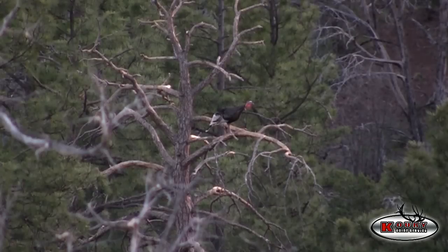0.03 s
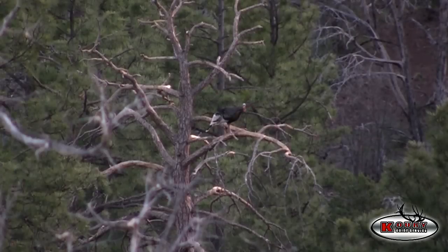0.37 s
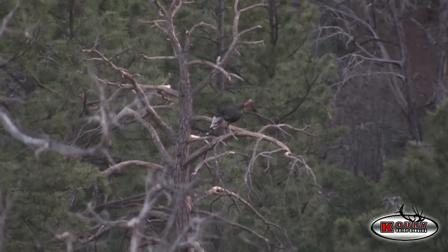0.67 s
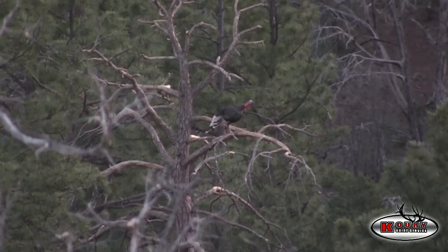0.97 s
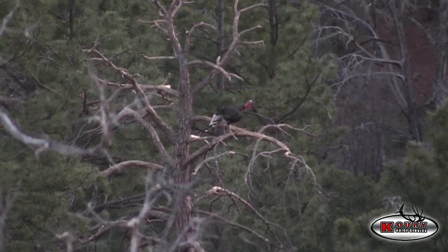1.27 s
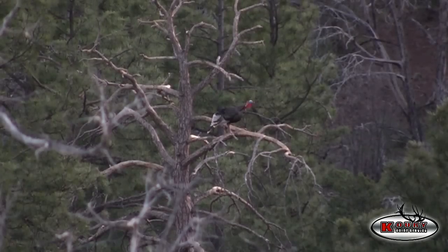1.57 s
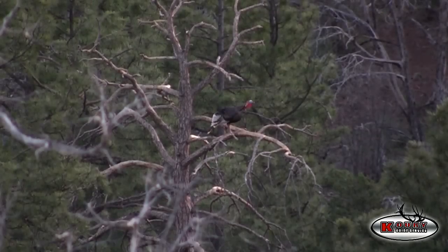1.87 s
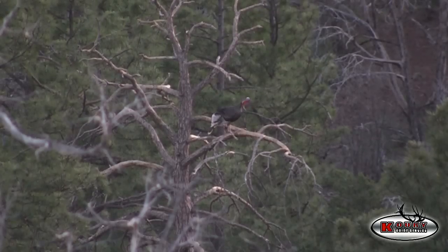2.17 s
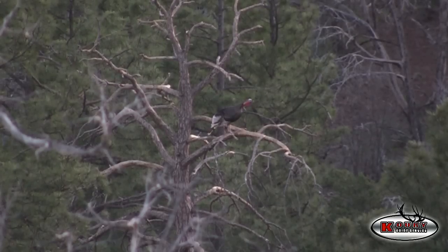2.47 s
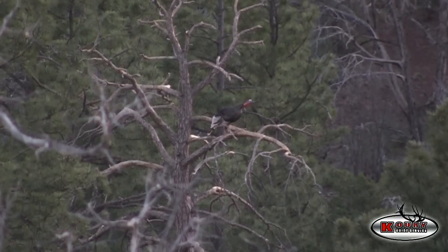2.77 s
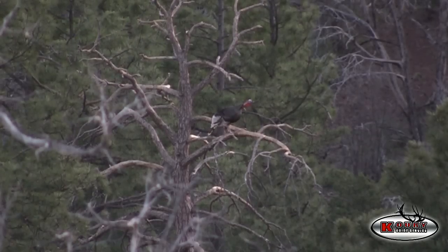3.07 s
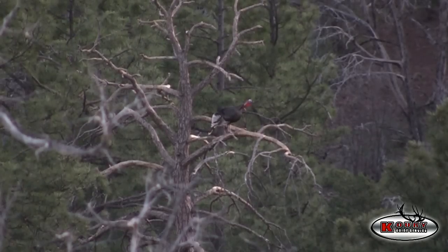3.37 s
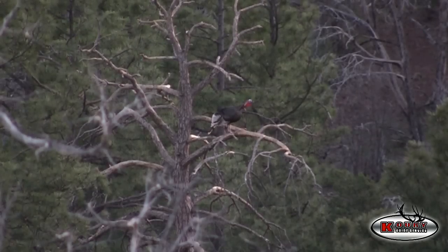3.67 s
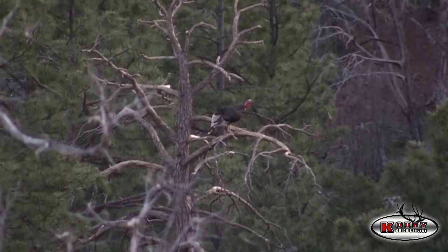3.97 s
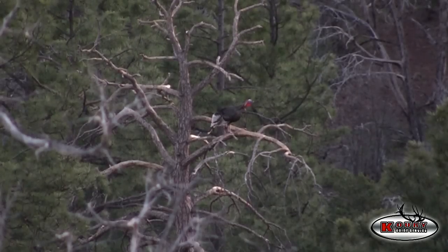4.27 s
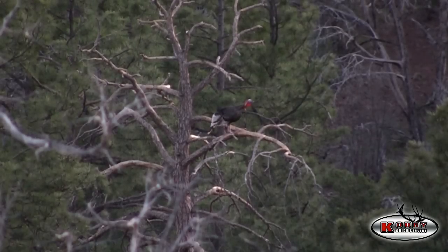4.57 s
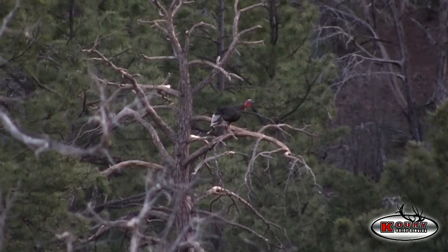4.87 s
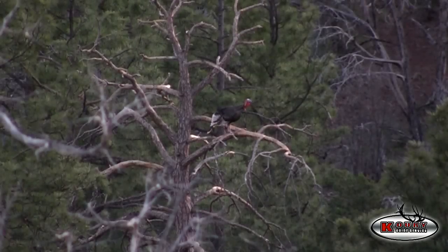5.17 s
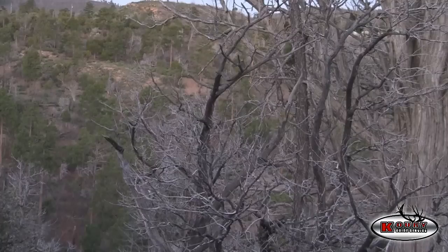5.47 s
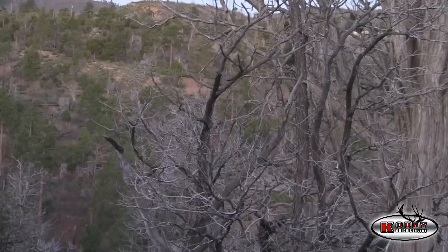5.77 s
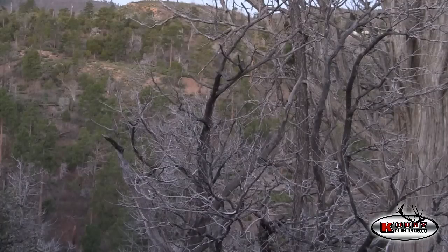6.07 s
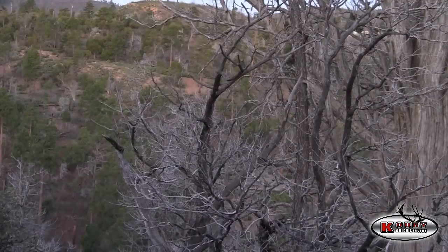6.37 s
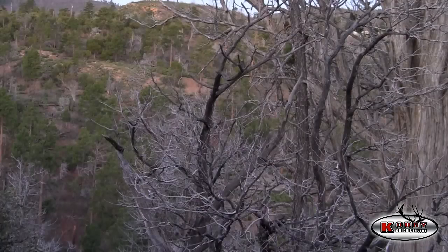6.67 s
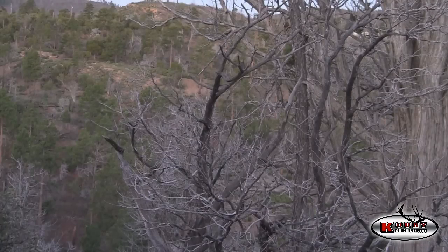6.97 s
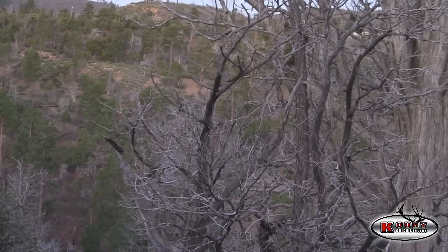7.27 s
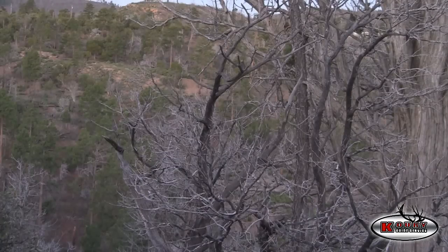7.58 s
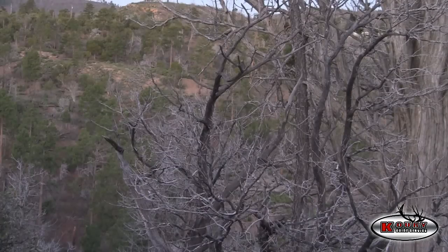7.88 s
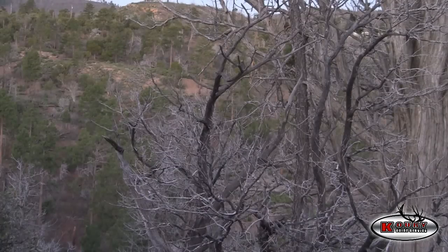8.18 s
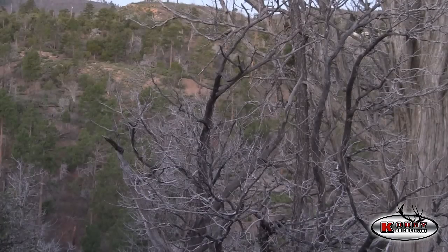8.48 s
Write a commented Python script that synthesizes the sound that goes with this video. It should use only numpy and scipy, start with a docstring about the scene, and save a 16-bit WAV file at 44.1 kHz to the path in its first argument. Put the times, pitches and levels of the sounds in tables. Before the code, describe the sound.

Five rattling turkey gobbles carry through the woods with a faint echo, while low wind rumble bumps the microphone early on.

```python
"""Wild turkey in a pine forest

A turkey gobbles five times from some way off. Pushes of air through its syrinx make a rattle of short
yelps and gulps around a few long slurs and warbles; a sharp putt opens the last gobble. A small bird
calls once, and the trunks scatter a faint echo over soft air noise and hiss. Wind eddies buffet the
right microphone, mostly in the first half; a bump, ticks and rustles sound close by."""
import sys
import numpy as np
from scipy import signal
from scipy.fft import rfft, irfft
from scipy.io import wavfile
from scipy.ndimage import map_coordinates

SR = 44100
rng = np.random.default_rng(int(sys.argv[2]) if len(sys.argv) > 2 else 0)


def generate_wav(sig):
    """Save sig (samples, or channels by samples) to the path in sys.argv[1] as 16-bit PCM at SR."""
    pcm = np.round(np.clip(np.atleast_2d(sig).T, -1, 1) * 32767).astype(np.int16)
    wavfile.write(sys.argv[1], SR, pcm)


N = 380583
TIME = np.arange(N) / SR

# Background air. Each row: frequency in Hz, relative spectral density in dB.
AIR_SPECTRUM = [(15, -13), (25, -8), (126, -4.5), (204, -5), (421, -7.5), (614, -10.5), (919, -14),
                (1170, -16), (1660, -18.5), (2300, -20.5), (3000, -21.5), (12500, -30), (15500, -34.5)]
# The air's upper band and its low band. Each row: time in seconds, gain in dB.
HISS_GAIN = [(0, 1), (1.9, 3), (2.28, 3), (2.3, -4), (2.45, -2), (2.7, 3), (4.55, 3), (6.1, 1.5), (8.63, 1)]
MURMUR_GAIN = [(0, 3), (.45, 3), (1.2, 1.5), (5.3, 2.5), (5.55, -1), (7, -0.5), (8.63, 0)]
# Wind buffets. Each row: start in seconds, length in seconds, eddy level in dB.
WIND_BUFFETS = [(1.815, .02, -28), (1.88, .01, -32), (2.047, .01, -21.5), (2.182, .008, -24.5),
                (2.302, .03, -29.5), (2.419, .04, -25.5), (2.486, .01, -14.5), (2.512, .005, -24),
                (2.578, .018, -21), (2.757, .03, -25.5), (3.153, .045, -20.5), (3.251, .06, -24),
                (3.327, .02, -17.5), (3.491, .02, -27), (3.666, .05, -26.5), (4.125, .03, -25),
                (4.164, .06, -28.5), (4.374, .03, -28.5), (4.426, .015, -21.5), (4.491, .02, -24.5),
                (4.55, .025, -25), (5.006, .02, -40), (5.353, .02, -39.5)]
# Quickness of the eddies as the wind rises and eases. Each row: time in seconds, frequency in Hz.
EDDY_FREQUENCY = [(2.1, 99), (2.35, 137), (2.5, 129), (2.75, 110), (3.2, 114), (3.7, 97), (5.4, 89.5)]
# Rumble between buffets. Each row: time in seconds, level in dB.
RUMBLE_LEVEL = [(0, -67), (1.1, -59.5), (1.55, -54.5), (1.85, -44), (2.1, -39.5), (2.25, -53.5),
                (2.42, -35.5), (2.7, -43.5), (2.95, -42), (3.3, -34), (3.6, -43.5), (3.95, -43.5),
                (4.2, -40), (4.55, -41.5), (4.75, -60), (5.35, -58), (5.5, -69), (8.63, -87)]
# Colour of that rumble. Each row: frequency in Hz, relative spectral density in dB.
RUMBLE_SPECTRUM = [(15, -38), (35, -6), (65, 1.5), (120, 1.5), (200, -13), (350, -25.5),
                   (800, -89), (3000, -85)]
# Rustles. Each row: start in seconds, length in seconds, level in dB, centre in Hz, width in Hz.
NEAR_RUSTLES = [(0.772, 0.029, -65, 6700, 900), (1.918, 0.11, -60, 1240, 500),
                (1.92, 0.11, -70, 3600, 1200), (2.297, 0.11, -67, 1190, 700),
                (4.54, 0.086, -65, 6000, 7000), (5.6, 0.073, -68, 13000, 4000),
                (5.78, 0.12, -69, 10900, 6000)]
# Dry ticks. Each row: start in seconds, level in dB, centre in Hz, width in Hz, decay in seconds.
DRY_TICKS = [(2.432, -55.5, 4650, 400, 0.0027), (4.511, -38.5, 2780, 7000, 0.0012),
             (4.679, -46.5, 2980, 3500, 0.0017)]
# The small bird's call. Each row: time in seconds, pitch in Hz, level in dB.
BIRD_CALL = [(7.28, 5450, -80), (7.305, 5020, -65), (7.345, 4020, -57.5), (7.37, 3320, -64),
             (7.376, 3710, -76), (7.382, 4020, -61), (7.41, 4200, -66), (7.44, 4050, -66),
             (7.46, 4100, -82)]
# Resonances of the putt. Each row: frequency in Hz, relative level in dB, 60 dB decay time in seconds.
PUTT_MODES = [(486, -13, 0.066), (815, -1, 0.023), (1090, -8, 0.021), (1300, -6, 0.047), (1720, -11, 0.045),
              (2000, -3.5, 0.031), (2800, -5, 0.021), (4500, -8, 0.016), (5170, -12, 0.022)]
# Throat resonances. Each row: centre in Hz, width in Hz, relative level in dB.
THROAT_MODES = [(676, 92, -11), (1108, 130, 10.5), (1340, 280, -5), (1710, 300, -7), (2200, 780, -9.5),
                (3400, 730, -32)]
# How strongly a harmonic carries. Each row: frequency in Hz, mellow gain in dB, harsh gain in dB.
VOICE_RESPONSE = [(485, -15, -21.5), (557, -14, 1), (610, 0.5, -5), (664, 0.5, -8), (710, -2.5, -9.5),
                  (790, -2, 4), (880, -9, 9.5), (1020, -0.5, 4.5), (1134, -3.5, -7.5), (1197, -10.5, -5),
                  (1320, -14, 1.5), (1430, -12.5, -2.5), (1520, -17, -27), (1653, -32, -3), (1870, -24, -4),
                  (1907, -24, -10.5), (2150, -21, -18), (2140, -27, -14.5), (2750, -42, -24),
                  (3400, -35, -29), (4200, -46, -40)]
# The voice of each gobble. Each row: start in seconds, harshness 0-1, gains in dB of fundamental,
# third harmonic and rasp, lead-in pitch in Hz, lead-in gain in dB.
GOBBLE_VOICES = [(.7, 0, -2, 1.5, 0, 535, -3), (2.5, 0.07, -1, 0.5, -4, 551, -2.5),
                 (5.5, 0.94, -3, -1.5, 0, 502.5, -2.5), (6.8, 0.92, -2, -5.5, -7, 505, -3.5),
                 (7.6, 0.28, -1, -2, 1.5, 515, 3)]
# Clucks that open a gobble. Each row: start in seconds, length in seconds, pitch in Hz, level in dB,
# roughness 0-1, third-harmonic gain in dB.
CLUCK_NOTES = [(2.546, 0.039, 601, -49, 0.94, 12), (5.528, .034, 555, -55, 0.4, 9.5),
               (6.866, 0.027, 624, -43.5, .09, -0.5), (7.641, 0.04, 588, -46.5, .23, 7)]
# Short arched yelps. Each row: start in seconds, length in seconds, pitch in Hz, level in dB,
# roughness 0-1.
YELP_NOTES = [(0.867, .021, 662, -41.5, 0.1), (1.054, 0.018, 653, -39.5, .05), (1.113, .011, 644, -42, 0),
              (1.176, .035, 647, -43.5, 0.3), (1.258, 0.019, 622, -43, 0.2),
              (1.305, 0.01, 638, -44.5, 0.24), (1.39, 0.035, 642, -49, 0.2), (2.705, .03, 708, -58, .4),
              (2.751, 0.023, 724, -40, 0.14), (2.951, 0.02, 677, -38.5, .1), (3.138, 0.022, 660, -40, 0.1),
              (3.203, .011, 637, -40.5, 0.2), (3.268, 0.029, 643, -41.5, 0.23),
              (3.345, 0.019, 646, -42, 0.15), (5.701, 0.021, 613, -54, 0.62), (5.756, .021, 608, -49, 0.6),
              (5.988, 0.012, 562, -48, 0.2), (6.148, .014, 566, -48.5, 0), (6.193, 0.014, 536, -52, 0.33),
              (6.278, 0.029, 575, -48.5, 0.1), (7.047, 0.019, 674, -52.5, .5),
              (7.289, 0.012, 594, -50, 0.2), (7.751, 0.075, 713, -53.5, 0.54),
              (7.859, 0.026, 643, -49.5, .3), (8.007, 0.026, 620, -53.5, .4),
              (8.317, 0.028, 614, -50.5, 0.2), (8.504, 0.018, 595, -52, .1), (8.57, 0.014, 576, -58, .35)]
# Long notes with two crests. Each row: start in seconds, length in seconds, pitch in Hz, level in dB,
# lead-in level in dB.
WARBLE_NOTES = [(0.922, 0.087, 679.4, -39, -44), (2.812, 0.091, 691, -36, -48),
                (3.017, .076, 669, -37.5, -37)]
# Low gulps, heard mostly in their octave. Each row: start in seconds, pitch in Hz, level in dB.
GULP_NOTES = [(1.458, 502, -52.5), (3.375, 511, -43.5), (5.925, 515, -49.5), (6.021, 527, -57.5),
              (6.346, 504, -53.5), (6.38, 462, -64), (7.091, 522, -51.5), (7.328, 500, -57),
              (7.445, 496, -60), (7.486, 498, -57), (7.53, 457, -62.5), (7.722, 457, -49), (7.98, 501, -63),
              (8.194, 496, -56.5), (8.247, 513, -51), (8.388, 465, -55.5), (8.444, 499, -53)]
# Long notes that climb and turn rough. Each row: start in seconds, length in seconds, base and top
# pitch in Hz, lateness of the top (1 is usual), level in dB, final roughness 0-1, lean from octave
# to fundamental in dB, third-harmonic gain in dB.
SLUR_NOTES = [(.76, 0.044, 643, 740, 1.2, -43.5, 0.16, -3, -3),
              (2.618, .087, 652, 774, 1.25, -38, 0.11, 13, 1),
              (5.584, 0.0815, 623, 671, 1.26, -47.5, 0.36, 11.5, -1),
              (5.823, 0.066, 569.5, 697, 1, -47.5, 0.64, 4, 5),
              (6.056, 0.05, 557, 705, 1, -49.5, 0.38, 4, 4),
              (6.923, .08, 595.4, 716, 1.4, -50, 0.46, 12.5, 5),
              (7.18, .064, 555, 680, 0.73, -50.5, 0.68, 4, 3),
              (7.402, 0.043, 554, 692, 1, -52.5, 0.5, 1, 0),
              (7.695, 0.052, 547, 733, 1.16, -53.5, .4, 11.5, 2),
              (7.9, 0.059, 532, 682, 1.07, -52, 0.38, 4.5, 3),
              (8.063, 0.091, 502.5, 684, 1.4, -53.5, 0.43, -3, 0)]
# Slides in the first gobble. Each row: start and length in seconds, first and last Hz, level in dB.
SLIDE_NOTES = [(0.757, 0.02, 450, 394, -49.5), (0.784, .044, 612, 525, -41.5)]
# Pitch in semitones at even steps through a yelp, a low note and a cluck.
YELP_ARCH = [-0.18, 0.23, -0.86]
LOW_SAG = [0.77, -0.24, 0]
CLUCK_DROP = [0, 0, 0, -.2, -2.1]
# A warble at even steps. Each row: pitch shift in semitones, gain in dB.
WARBLE_SHAPE = [(0.5, 2), (0.2, 2.5), (-1.9, -0.5), (-1, 0.5), (-0.5, 2), (1.57, -2), (0.7, -1.5),
                (0.5, -5), (-2, -1)]
# A slur at even steps. Each row: share of the way from base to top pitch, gain in dB.
SLUR_SHAPE = [(.05, -4.5), (.17, 2), (.7, 2.5), (.9, 3), (0.99, -.5), (.88, -.5), (.1, -6.5)]


def undb(db):
    """Amplitude grows tenfold with every 20 dB."""
    return 10 ** (np.asarray(db) / 20)


def shifted(hz, semitones):
    """Frequency doubles with every twelve semitones."""
    return hz * 2 ** (np.asarray(semitones) / 12)


def unit(x):
    """Normalisation to rms 1."""
    return x / np.sqrt(np.mean(x ** 2) + 1e-20)


def curve(rows, column=1):
    """Linear interpolation of a table column over time."""
    rows = np.array(rows)
    return np.interp(TIME, rows[:, 0], rows[:, column])


def contour(steps, along):
    """Spline interpolation of even steps at progress 0-1."""
    return map_coordinates(np.array(steps, float), [along * (len(steps) - 1)], order=2, mode="nearest")


def add(out, s, x):
    """Superposition of x on out from time s."""
    i = max(int(s * SR), 0)
    out[i:i + len(x)] += x[:max(N - i, 0)]


def resonate(x, hz, width_hz):
    """Two like resonators in series, each width_hz wide, with gain 1 at the centre."""
    b, a = signal.iirpeak(hz, hz / width_hz, fs=SR)
    return signal.lfilter(b, a, signal.lfilter(b, a, x))


def wander(size, rate):
    """Smooth random modulation through rate values a second."""
    at = np.arange(size) * rate / SR
    return map_coordinates(rng.standard_normal(int(at[-1]) + 4), [at + 1], order=2, mode="nearest")


def coloured(spectrum):
    """Spectral shaping of white noise; rms 1."""
    hz, db = np.transpose(spectrum)
    bins_hz = np.arange(N // 2 + 1) * SR / N
    gain = undb(np.interp(np.log(bins_hz + 1), np.log(hz), db))
    return unit(irfft(rfft(rng.standard_normal(N)) * gain, N))


def pan(x, left_db):
    """Direction by level difference, left minus right."""
    return x * undb(np.array([[left_db], [-left_db]]) / 2)


def air(level_db=-55, shared=.15, split_hz=450):
    """Partly coherent noise: a low murmur that sinks in the second half, and a hiss that dips briefly."""
    common = np.sqrt(shared) * coloured(AIR_SPECTRUM)
    noise = np.array([np.sqrt(1 - shared) * coloured(AIR_SPECTRUM) + common for _ in range(2)])
    low = signal.sosfiltfilt(signal.butter(2, split_hz, fs=SR, output="sos"), noise)
    hiss = (noise - low) * undb(curve(HISS_GAIN))
    murmur = low * undb(curve(MURMUR_GAIN) + .1 * wander(N, 7.1))
    return pan(hiss + murmur, left_db=-2.5) * undb(level_db)


def buffeting(gap_s=.01566, scatter_db=2, churn_db=2):
    """Turbulence at a microphone port: each eddy is a sharp suction between two swells, over a rumble."""
    out, t = np.zeros(N), np.arange(-SR // 50, SR // 50) / SR
    for s, length, db in WIND_BUFFETS:
        hz = np.interp(s, *np.transpose(EDDY_FREQUENCY))
        for k, (late, size, pitch) in enumerate(rng.standard_normal((8, 3))):
            if k * gap_s < length:
                u = (np.pi * t * hz * np.exp(.15 * pitch)) ** 2
                eddy = (2 * u - 1) * np.exp(-u)
                follower = k > 0  # eddies after the first come unevenly
                centre_s = s + .0045 + k * gap_s + .0034 * late * follower
                add(out, centre_s + t[0], eddy * undb(db + scatter_db * size * follower))
    return out + undb(curve(RUMBLE_LEVEL) + churn_db * wander(N, 14)) * coloured(RUMBLE_SPECTRUM)


def wind(leak_db=-15, sheltered_db=-20, lag_s=.0031):
    """Sheltering: the right port faces the wind; the left feels it later, with weak eddies of its own."""
    right = buffeting()
    left = undb(leak_db) * np.roll(right, int(lag_s * SR)) + undb(sheltered_db) * buffeting()
    return np.array([left, right])


def rustles(grain_db=3):
    """Random amplitude modulation turns bands of noise into faint grainy swishes."""
    out = np.zeros(N)
    for s, length, db, hz, width in NEAR_RUSTLES:
        size = int(length * SR)
        grains = rng.standard_normal(size) * undb(grain_db * wander(size, 304))
        add(out, s, unit(resonate(grains, hz, width)) * np.hanning(size) ** .5 * undb(db))
    return out


def ticks():
    """Noise bursts with a fast exponential decay excite a resonance: tiny dry ticks."""
    out, t = np.zeros(N), np.arange(SR // 20) / SR
    for s, db, hz, width, decay in DRY_TICKS:
        tick = resonate(rng.standard_normal(len(t)) * np.exp(-t / decay), hz, width)
        add(out, s, tick * undb(db) / np.abs(tick).max())
    return out


def bump(s=2.323, level_db=-36, hz=450, rise_s=.0043):
    """One heavily damped mode swells and dies: a soft hollow bump."""
    out, t = np.zeros(N), np.arange(SR // 16) / SR
    ring = np.sin(2 * np.pi * hz * t) * t * np.exp(-2 * t / rise_s)
    add(out, s, ring * undb(level_db) / np.abs(ring).max())
    return out


def forest_echo(x, t60_s=1, level_db=-6, early_s=.023, early_db=7, shared=.51):
    """Scattering by trunks: a quick cluster of reflections, then a thin tail."""
    t = np.arange(SR) / SR
    onset = np.clip(t / .0019 - .5, 0, 1)
    fade = undb(-60 * t / t60_s) * (1 + undb(early_db) * np.exp(-t / early_s)) * onset
    common = rng.standard_normal(SR)
    tails = [fade * (shared * common + (1 - shared) * rng.standard_normal(SR)) for _ in range(2)]
    return undb(level_db) * np.array([signal.fftconvolve(x, h / np.linalg.norm(h))[:N] for h in tails])


def small_bird(depth_hz=220, rate_hz=66, echo_s=.013, echo_db=-8, gain_db=-1):
    """Frequency modulation: a whistle falls and then warbles, doubled by a near reflection."""
    warble = depth_hz * np.sin(2 * np.pi * rate_hz * TIME) * (TIME > BIRD_CALL[4][0])
    phase = 2 * np.pi * np.cumsum(curve(BIRD_CALL) + warble) / SR
    sounding = (TIME > BIRD_CALL[0][0]) & (TIME < BIRD_CALL[-1][0])
    song = np.sqrt(2) * np.sin(phase) * undb(curve(BIRD_CALL, column=2) + gain_db) * sounding
    return song + undb(echo_db) * np.roll(song, int(echo_s * SR))


def putt(s=7.615, level_db=-34, push_s=.002):
    """Free decay: one short push rings a stack of damped resonances, giving a sharp cluck."""
    out, t = np.zeros(N), np.arange(SR // 8) / SR
    ring = sum(undb(db - 60 * t / t60) * np.sin(2 * np.pi * (hz * t + rng.random()))
               for hz, db, t60 in PUTT_MODES)
    ring = ring * (1 - np.exp(-t / push_s)) * (1 + .27 * wander(len(t), 720))
    add(out, s, ring * undb(level_db) / np.abs(ring).max())
    return out


def voice_at(s):
    """The voice settings of the gobble at time s."""
    return GOBBLE_VOICES[max(sum(row[0] <= s for row in GOBBLE_VOICES) - 1, 0)][1:]


def push(length, edge_s=.009, swell_db=.5):
    """Airflow sets the envelope: the progress 0-1 and gain of one push, strongest in its middle."""
    t = np.arange(int((length + edge_s) * SR)) / SR - edge_s / 2
    along = np.clip(t / length, 0, 1)
    gate = np.sin(np.pi / 2 * np.clip(np.minimum(t, length - t) / edge_s + .5, 0, 1)) ** 2
    return along, gate * undb(swell_db * (np.sin(np.pi * along) - 2 / np.pi))


def slide(length, start_hz, end_hz, jitter=.019):
    """Biphonation: the other side of the syrinx sounds a nearly pure falling tone."""
    along, envelope = push(length)
    hz = (start_hz + (end_hz - start_hz) * along) * (1 + jitter * wander(len(along), 390))
    return envelope * np.sqrt(2) * np.sin(2 * np.pi * np.cumsum(hz) / SR)


def rasp(phase, harsh, harsh_db_per_octave=4, slip=.22, scatter_db=2):
    """Impulse excitation: the membranes slap about every third cycle and ring the throat; rms 1."""
    count = np.floor(phase / (6 * np.pi) + slip * wander(len(phase), 200))
    slaps = np.diff(count, prepend=phase[0] // (6 * np.pi)) > 0
    pulses = slaps * undb(scatter_db * rng.standard_normal(len(phase)))
    return unit(sum(undb(db + harsh * harsh_db_per_octave * np.log2(hz)) * resonate(pulses, hz, 2 * width)
                    for hz, width, db in THROAT_MODES))


def note(s, length, pitches, levels_db, rough, lean_db=0, bright_db=0, body_db=0, roughen=0,
         jitter=.014, flutter_db=2.4):
    """Source and filter: harmonics of the syrinx flare and fade as they sweep through resonances."""
    harsh, first_db, third_db, rasp_db, _, _ = voice_at(s)
    along, envelope = push(length)
    hz, db = contour(pitches, along), contour(levels_db, along)
    rough = rough * (1 - roughen * (1 - along))
    unsteady_hz = hz * (1 + jitter * (1 + 2 * rough) * wander(len(hz), 382))
    phase = 2 * np.pi * (np.cumsum(unsteady_hz) / SR + rng.random())
    at_hz, mellow_db, harsh_db = np.transpose(VOICE_RESPONSE)
    response_db = mellow_db + harsh * (harsh_db - mellow_db)
    first, second, third, *upper = (np.interp(k * hz, at_hz, response_db) for k in range(1, 7))
    lean = lean_db * (2 * along - 1)  # if positive, the octave leads and the fundamental swells late
    partials_db = [first + first_db + body_db + lean, second - lean, third + third_db + bright_db, *upper]
    tone = sum(undb(partial_db + flutter_db * wander(len(hz), 104)) * np.sin(k * phase)
               for k, partial_db in enumerate(partials_db, 1))
    # In a rough note a slower beat splits each harmonic into sidebands.
    beat = .99 * np.cos(phase * 2 / 3 + .7 * wander(len(hz), 150))
    rattle = rasp(phase, harsh) * undb(rasp_db) * np.hypot(undb(second), undb(third))
    return envelope * undb(db) * (np.sqrt(2) * tone * (1 + rough * beat) + rough * rattle)


def turkey(early_s=.004, lead_s=.018, overlap_s=.005, gulp_s=.017, low_rough=.26):
    """Pulsed airflow breaks each gobble into notes; yelps and warbles scoop up from a low lead-in."""
    out, leads = np.zeros(N), []
    for s, length, hz, db, rough, bright_db in CLUCK_NOTES:
        cluck = note(s, length, shifted(hz, CLUCK_DROP), [db, db], rough,
                     bright_db=bright_db, body_db=-8.5)  # thin fundamental
        add(out, s - early_s, cluck)
    for s, length, hz, db, rough in YELP_NOTES:
        add(out, s - early_s, note(s, length, shifted(hz, YELP_ARCH), [db, db], rough))
        leads.append((s, db + 8.5 - 880 * length))  # a shorter yelp puts more air into its lead-in
    semitones, warble_db = np.transpose(WARBLE_SHAPE)
    for s, length, hz, db, lead_db in WARBLE_NOTES:
        add(out, s - early_s, note(s, length, shifted(hz, semitones), db + warble_db, rough=.045))
        leads.append((s, lead_db))
    for s, db in leads:
        *_, hz, gain_db = voice_at(s)
        lead_in = note(s, lead_s, shifted(hz, LOW_SAG), [db + gain_db] * 2, low_rough)
        add(out, s - early_s - lead_s + overlap_s, lead_in)
    for s, hz, db in GULP_NOTES:
        add(out, s - early_s, note(s, gulp_s, shifted(hz, LOW_SAG), [db, db], low_rough))
    climb, slur_db = np.transpose(SLUR_SHAPE)
    steps = np.linspace(0, 1, len(SLUR_SHAPE))
    for s, length, base_hz, top_hz, late, db, rough, lean_db, bright_db in SLUR_NOTES:
        pitches = base_hz + (top_hz - base_hz) * np.interp(steps ** late, steps, climb)
        slur = note(s, length, pitches, db + slur_db, rough, lean_db, bright_db, roughen=.96)
        add(out, s - early_s, slur)
    for s, length, start_hz, end_hz, db in SLIDE_NOTES:
        add(out, s - early_s, slide(length, start_hz, end_hz) * undb(db))
    return out


def scene():
    """Superposition: birds straight ahead with their echo, small dry sounds close by, wind and air."""
    calls = turkey() + putt() + small_bird()
    distant = pan(calls, left_db=.11) + forest_echo(calls)
    close = pan(ticks() + bump() + rustles(), left_db=-5)
    return distant + close + wind() + air()


def record(dry, top_hz=15700):
    """Band limiting: a steep low-pass filter cuts the top."""
    return signal.sosfilt(signal.ellip(10, .1, 70, top_hz, fs=SR, output="sos"), dry)


dry = scene()
out = record(dry)
generate_wav(out)
```